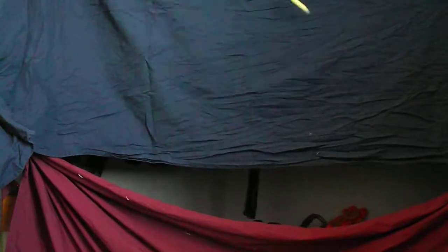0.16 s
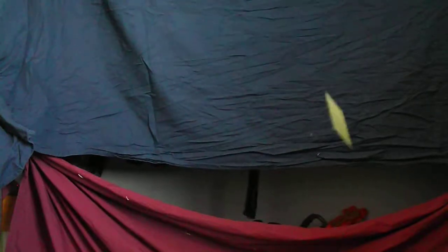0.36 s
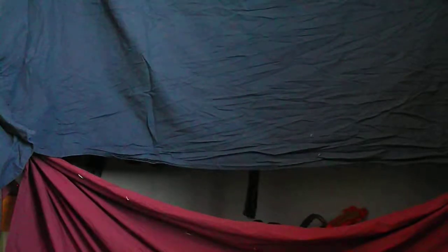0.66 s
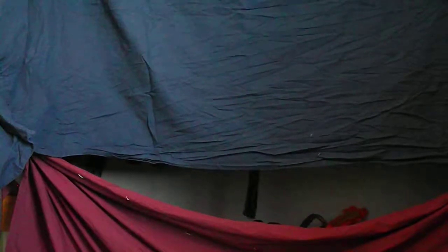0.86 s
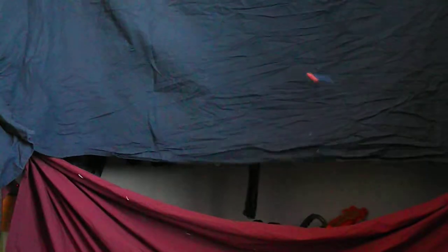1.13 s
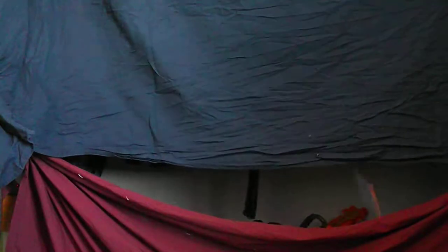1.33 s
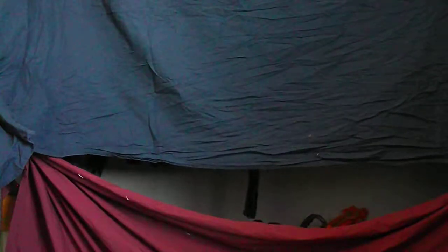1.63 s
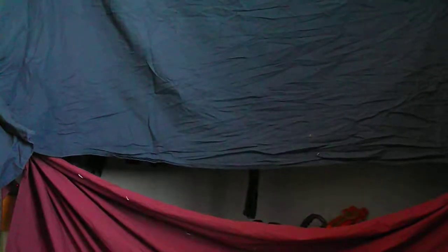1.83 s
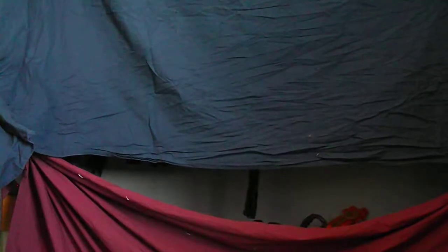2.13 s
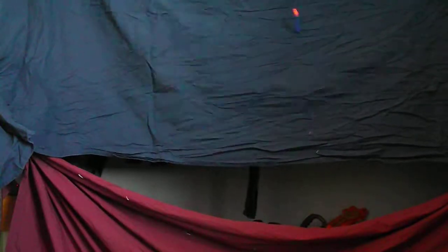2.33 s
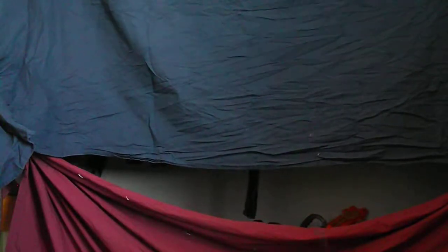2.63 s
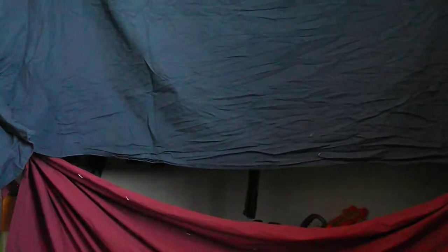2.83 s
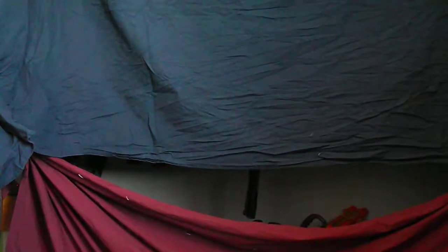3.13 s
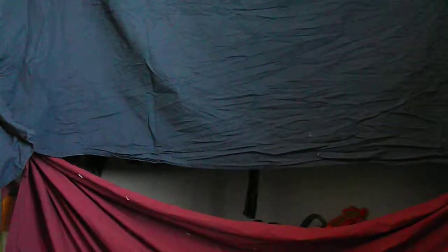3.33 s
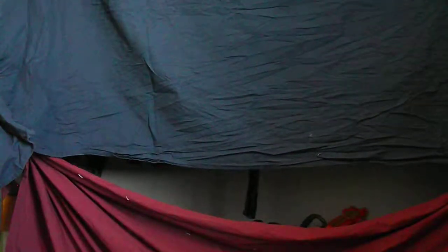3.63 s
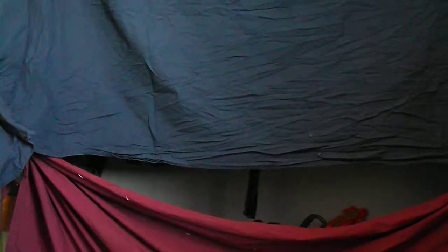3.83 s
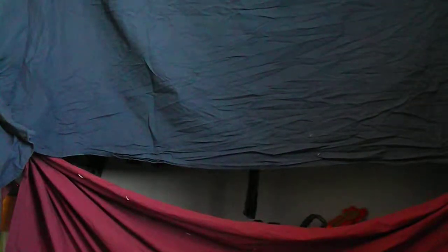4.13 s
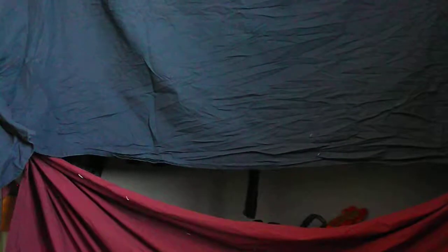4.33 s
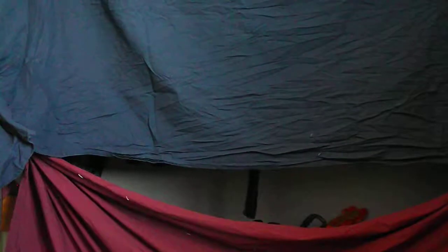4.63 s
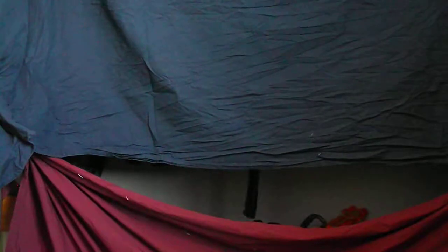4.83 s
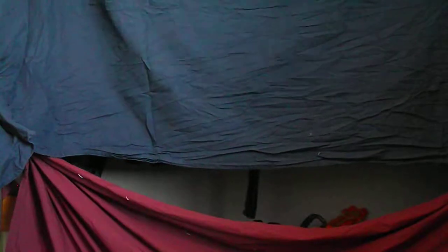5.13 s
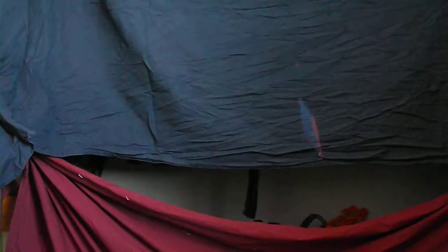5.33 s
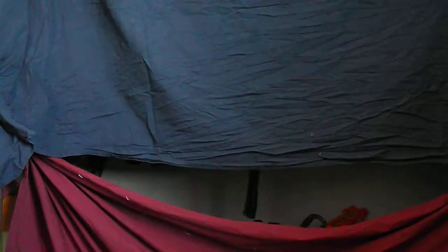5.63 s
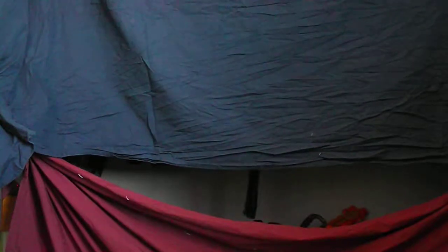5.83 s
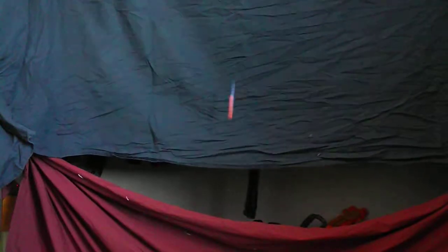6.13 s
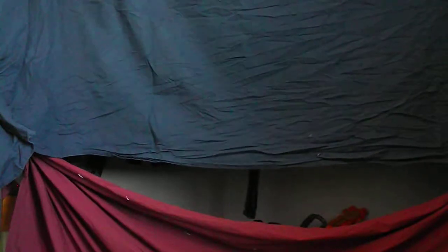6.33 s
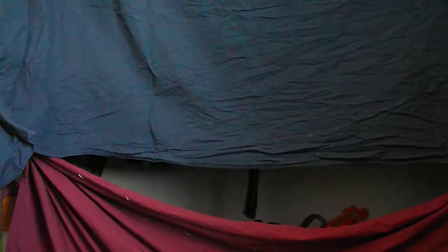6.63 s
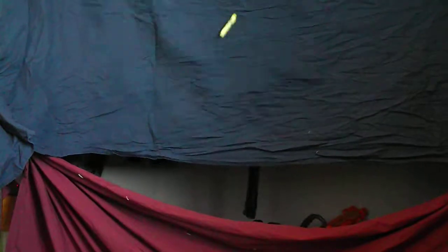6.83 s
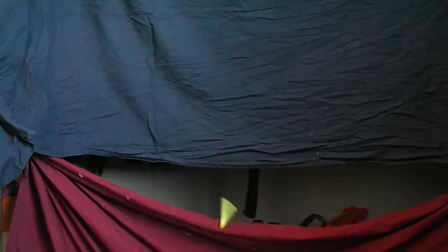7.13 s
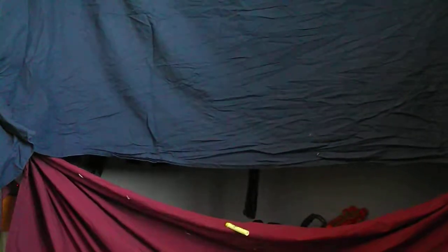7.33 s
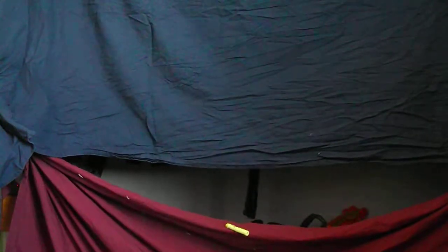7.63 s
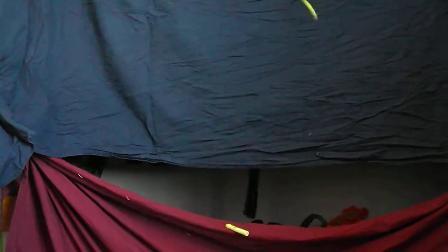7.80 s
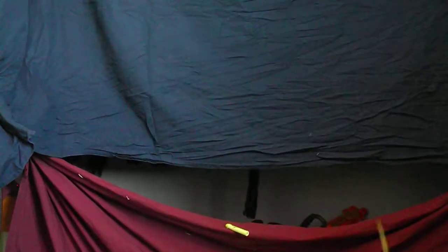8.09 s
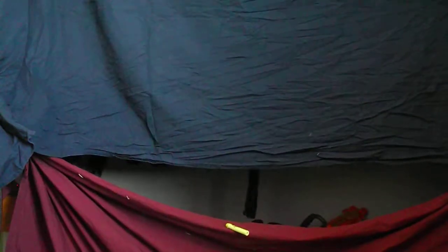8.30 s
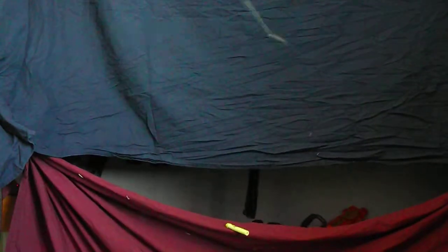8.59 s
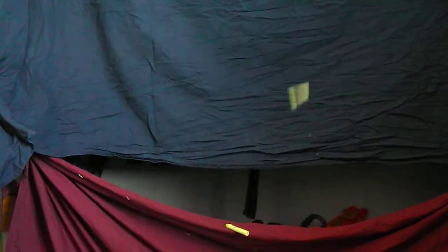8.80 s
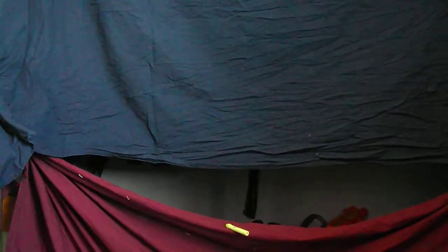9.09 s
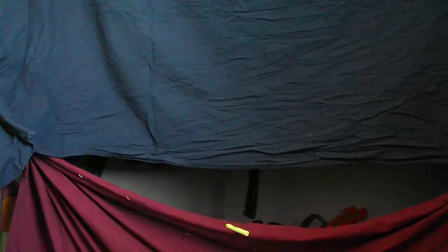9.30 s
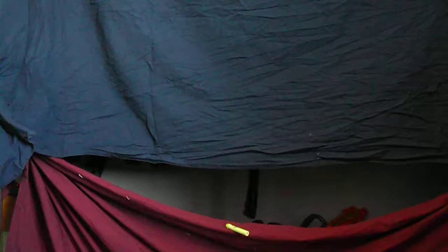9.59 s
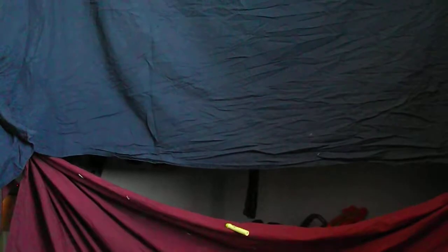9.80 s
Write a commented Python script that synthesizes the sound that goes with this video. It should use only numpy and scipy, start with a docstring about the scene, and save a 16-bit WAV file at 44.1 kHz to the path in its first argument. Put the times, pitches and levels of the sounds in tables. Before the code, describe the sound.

A dart thumps cloth, then a pump-action plastic toy is racked with sharp double clacks and scraping slide. Each trigger click releases a hard plunger slam with a short tubular ring, and a boomy cloth thud a tenth of a second later. Slow at first, then a steady run of shots, finally rattly handling. Dry small room, close, slightly overloaded microphone with hiss and a thin whine.

```python
"""A small furnished room, close to a camera: a pump-action toy dart blaster is racked eight times, fired seven.
Catches and stops clack as rough bursts through plastic shell resonances, and the slide scrapes as clumped slips.
The sprung plunger slams air into ringing tube notes; about a tenth of a second later the dart thumps a hanging
sheet, a pulse of air with a boom and a foam tick. One more dart hits right at the start. Sparse echoes make
the room; the camera adds hiss, faint whines, a frame-rate buzz, a limiter and overload."""
import sys
import numpy as np
from scipy import signal
from scipy.fft import rfft, irfft
from scipy.io import wavfile
from scipy.ndimage import uniform_filter1d

SR = 44100
rng = np.random.default_rng(int(sys.argv[2]) if len(sys.argv) > 2 else 0)


def linear_from_db(decibels):
    """Turn decibels (scalar or array-like) into linear amplitude factors; 0 gives 1."""
    return 10 ** (np.asarray(decibels, float) / 20)


def wrap_up_sound(samples):
    """Save the sound to the file named by the first command line argument, as 16-bit audio."""
    columns = np.atleast_2d(samples).T
    # keep every value between -1 and 1, then stretch to whole-number steps
    tamed = np.clip(columns, -1, 1)
    steps = np.round(tamed * 32767).astype(np.int16)
    wavfile.write(sys.argv[1], SR, steps)


N = 438794  # length in samples

# Levels in the tables balance the layers before the room and the camera.
# camera hiss, spectrum shape only: pitch_hz, relative density_db
HISS_SHAPE = [(20, -4), (65, -7), (100, -13.5), (230, -13), (700, -17.5), (1500, -26.5), (5000, -28.5),
              (7000, -23.5), (8800, -28), (11000, -18.5), (13000, -30), (16000, -38.5)]
HISS_DB = -49.5  # rms, ahead of the limiter
# steady camera whines: pitch_hz, level_db (rms, ahead of the limiter)
WHINES = [(9523, -61), (9597, -64), (9561, -71), (11240, -68)]
# buzz once a picture frame: pitch_hz, level_db (rms while on, ahead of the limiter)
BUZZ = [(3768, -60.5), (7540, -56), (11300, -66), (15070, -75)]
FRAMES_PER_S, BUZZ_CENTRE = 30.02, .32  # middle of the buzz, as a share of the frame
LIMIT_DB, LIMIT_SHARE = -10, .7  # threshold; share of the excess that is taken off
LIMIT_GRAB_S, RECOVER_DB_PER_S = .012, 26  # smoothing time constant; climb of the gain
# room decay by band: pitch_hz, t60_s
ROOM_DECAY = [(100, 0.12), (530, 0.27), (1400, 0.23), (3700, 0.26), (9700, 0.16), (16000, 0.28)]

# low wobble when the furniture or the camera stand is nudged: start_s, level_db, t60_s
NUDGES = [(3.64, -31, 0.95), (3.77, -35, 0.36), (4.18, -36.5, 0.91), (9.36, -39, 2.2)]
NUDGE_RISE_S = 0.042

# darts stopped by the sheet: start_s, push_db, tick_db
DARTS = [(.0004, -13.5, -15), (.9668, -8, -11), (2.189, -9.5, -15), (4.925, -8, -14.5), (5.817, -6.5, -9.5),
         (6.7101, -7.5, -9.5), (7.5986, -5, -7), (8.5528, -15.5, -17)]
# slack sheet booming after the push: pitch_hz, level_db, t60_s
SHEET = [(65.3, -23, 0.42), (123, -44, 0.12), (270, -49, 0.083), (326.7, -13.5, 0.098)]
# fallen darts land softly on cloth: start_s, level_db
LANDINGS = [(2.722, -30), (5.483, -30.5), (9.057, -29.5)]

# plastic shell resonances, in three groups: pitch_hz, width_hz, level_db
SHELL_LOW = [(309, 40, -9), (555, 263, -5.5), (814, 278, 0), (1210, 298, -4.5)]
SHELL_MID = [(1580, 181, -3.5), (1920, 940, -11.5), (2804, 494, -4.5), (3425, 1400, -8), (4360, 1720, -12)]
SHELL_HIGH = [(5170, 4700, -8.5), (6140, 520, 4), (8030, 470, -6.5), (10930, 1500, -8.5),
              (12000, 2700, -13), (15000, 1400, -40)]
SHELL_GROUPS = (SHELL_LOW, SHELL_MID, SHELL_HIGH)

# Every rack of the pump has three clacks, each a first blow, a rattle halfway and a last blow.
# the pump, pulled back, takes up the plunger: start_s, to_last_blow_s, first_db, last_db
TAKE_UPS = [(0.1421, 0.022, -8.5, -3.5), (1.0874, 0.022, -9.5, 0), (2.861, 0.0069, -11, -9.5),
            (4.142, .019, -6, -5.5), (5.0385, 0.015, -12, -3), (5.912, .021, -5, 0), (6.8284, .016, -5, -5),
            (7.725, 0.019, -4.5, -3)]
# the plunger latches at the back stop: start_s, to_last_blow_s, first_db, last_db
BACK_STOPS = [(.208, 0.0091, -5, -0.5), (1.1525, .011, -0.5, -4.5), (2.9221, 0.0081, -7.5, -12),
              (4.2022, 0.013, -3, -2), (5.0888, 0.0083, -2, -1.5), (5.9748, .0115, -5.5, 3),
              (6.8848, 0.0084, -4, -4), (7.7819, 0.0095, -7, 1)]
# the pump, pushed forward, closes the breech: start_s, to_last_blow_s, first_db, last_db
CLOSES = [(0.5399, 0.015, -2, -3.5), (1.4966, .012, -4, -8), (3.1482, 0.029, -18, -17),
          (4.5637, .0146, -5, -2.5), (5.4009, .015, -4, -2), (6.2968, .016, -4.5, -1),
          (7.2026, .0165, -4, -1.5), (8.1006, 0.011, -4.5, 1.5)]
# colour of each clack, rows first blow, rattle, last blow: low_db, high_db (against the middle modes)
TAKE_UP_TONE = [(3.5, 0), (-0.5, -3), (1, -4)]
BACK_STOP_TONE = [(0, -6), (0, 0), (1, -6.5)]
CLOSE_TONE = [(-1.5, -0.5), (-1, -3), (4, -13)]
# rattle against the mean of first and last blow: take_up_db, back_stop_db, close_db
RATTLE_DB = (-1.5, -8, -6.5)
# the pump starts forward: start_s
PUSH_STARTS = [.345, 1.311, 3.083, 4.355, 5.2248, 6.1303, 7.035, 7.937]

# the trigger clicks as it is squeezed: start_s, level_db
TRIGGER = [(0.7892, -26), (0.8244, -26), (2.0276, -31), (2.048, -24), (4.784, -27), (5.6337, -31.5),
           (5.665, -24), (6.486, -27), (6.5358, -24.5), (6.57, -27.5), (7.435, -19.5), (7.462, -23.5),
           (8.381, -23), (8.416, -25)]
# parts tick past each other while the pump travels: start_s, level_db
TICKS = [(.0755, -18), (.0838, -19), (.0916, -17.5), (.1931, -9), (.461, -23), (.4717, -18), (.507, -20),
         (.5142, -10), (1.0538, -17), (1.1361, -29), (1.311, -20), (1.3502, -24), (1.42, -19.5),
         (1.4364, -19), (1.4677, -20), (2.7778, -24), (2.8036, -23), (2.8113, -22), (4.0924, -22.5),
         (4.1368, -21), (4.196, -24), (4.403, -25), (4.4248, -24.5), (4.489, -19.5), (4.5047, -17.5),
         (4.535, -14.5), (4.5548, -14), (4.9971, -18.5), (5.0121, -10.5), (5.076, -9.5), (5.2248, -21.5),
         (5.277, -28.5), (5.3338, -15.5), (5.3782, -14.5), (5.881, -15.5), (5.8956, -16), (6.1303, -17.5),
         (6.164, -20.5), (6.2263, -14.5), (6.2473, -15.5), (6.2739, -15), (6.7716, -17), (6.7906, -20),
         (6.823, -9.5), (7.0892, -24.5), (7.127, -26.5), (7.1388, -16.5), (7.1597, -14), (7.1807, -13.5),
         (7.195, -13), (7.6646, -14), (7.685, -12.5), (7.7766, -9.5), (7.9569, -22), (8.04, -16.5),
         (8.0547, -25), (8.0734, -21), (8.0795, -10.5), (8.0942, -8.5)]
# a small catch snaps, thin and bright: start_s, level_db
SNAPS = [(.348, -41), (.405, -37), (2.98, -32.5), (3.138, -34), (4.094, -35), (4.1156, -23.5),
         (4.3557, -29), (4.377, -27), (4.426, -28), (5.368, -26), (6.118, -23.5), (6.2365, -23),
         (7.018, -29.5), (7.039, -25.5), (7.936, -23.5), (8.072, -21)]
# colour of small sounds: low_db, high_db (against the middle modes)
TRIGGER_TONE, TICK_TONE = (-2, -8), (0.71, -9)
SNAP_TONE = (-5, 2.4)
# knocks while the blaster is turned in the hands: start_s, level_db, low_db, high_db (against the middle modes)
HANDLING = [(2.2529, -19, -6, -6.5), (2.281, -21.5, -1, -16), (2.3649, -23.5, 11, -3.5),
            (2.6157, -19.5, 1.5, -6), (3.083, -29.5, -13, -2), (3.1563, -19.5, 3, -19),
            (3.2865, -31, -3.5, -12), (3.6696, -25.5, -11, -5.5), (3.69, -39.5, -1, -8),
            (3.8976, -26, 13, -5), (3.9323, -23, 3, -2), (8.6216, -30, 3, -23), (8.6703, -13.5, -2, -11.5),
            (8.855, -37.5, 10, -5), (9.045, -41, -5, -12), (9.0842, -21, -3, -4), (9.1312, -19, 4, 0),
            (9.174, -13.5, -8, -7), (9.1795, -4, -4.5, -9), (9.19, -3.5, -2.5, -9), (9.2005, -8, 0, -6),
            (9.222, -27, 5, -13), (9.256, -34, -2, -7), (9.281, -16, 5, -10), (9.2876, -26, 13, -11),
            (9.33, -44, -1, -8), (9.3483, -11, 5, -22), (9.3605, -6.5, 1, -9), (9.383, -32, 25, -22),
            (9.5289, -20.5, -3, -10.5), (9.5439, -20, 14, -16), (9.566, -22, 10, -15), (9.59, -30, 10, -10),
            (9.7, -29, 12, -10), (9.8015, -24, 9, -9), (9.5573, -21, -3, -8), (9.6171, -16.5, 0, -8),
            (9.6501, -15, -0.5, -10), (9.6632, -22, 12, 2), (9.736, -23, 3, -6), (9.8347, -19.5, 10.5, -15)]
# shape of first blows and rattles, and of all the small sounds: decay_s, rise_s
HARD_BLOW_S, LIGHT_BLOW_S = (.004, .0008), (.005, 0.0014)
# shape of the last blow of a clack: decay_s, rise_s
LAST_BLOW_S = (0.002503, 0.000605)

# Pulled, the slide scrapes from a little before take-up to the back stop and lets go;
# pushed, it scrapes, then rushes home.
PULL_LEAD_S, LET_GO_S, RUSH_S = .045, .07, .06
# sliding force against the louder of the first and last blow of the take-up
PULL_START_DB, TAKE_UP_DB, BACK_DB, LET_GO_DB = -39.5, -26, -21, -34
# sliding force against the louder of the first and last blow of the close
PUSH_DB, RUSH_DB, CLOSE_DB = -35, -33.5, -21

# shots: release_s, latch_db, slam_db, rebound_db, release_to_rebound_s
SHOTS = [(.8684, -7, 6.5, -3.5, 0.018), (2.0806, -6.5, 3.5, -4, 0.02), (4.827, -1.5, 3.5, -3, 0.018),
         (5.7178, -4.5, 3, -1, 0.018), (6.608, 0, 4, 2, 0.016), (7.501, -4, 4, 1.5, 0.019),
         (8.4554, 0.5, -2.5, -7.5, 0.012)]
# air tube and barrel ringing after the slam, until choked: pitch_hz, level_db, t60_s
TUBE = [(70, -19.5, 0.11), (141, -4.5, 0.05), (248, -8.5, 0.086), (324.4, -2, 0.18), (480.4, -4.5, 0.17),
        (709, 7.5, 0.017), (909, -3.5, 0.1), (1182, -1.5, 0.055), (1432, -9, 0.12)]
# air column left humming: pitch_hz, width_hz, level_db
BARREL = [(420, 105, -13), (560, 90, -7), (750, 250, -16.5)]


def evened(x):
    """Scales to rms 1."""
    return x / np.sqrt(np.mean(x ** 2) + 1e-20)


def read(points, hz):
    """Reads a table on a log-frequency axis."""
    f, value = np.transpose(points)
    return np.interp(np.log(hz + 1), np.log(f + 1), value)


def add(mix, s, sound):
    """Mixes a sound in at s seconds."""
    part = mix[round(s * SR):][:len(sound)]
    part += sound[:len(part)]


def level(curves):
    """Sums the gains of several dB curves over time, each near silent outside its span."""
    t = np.arange(N) / SR
    return sum(linear_from_db(np.interp(t, *np.transpose(rows), -120, -120)) for rows in curves)


def through(x, modes, grip):
    """Two-pole resonances of alternating sign, shifted a little by the grip; white noise keeps its level."""
    taps, t = 0, np.arange(2048) / SR
    for k, (hz, width, db) in enumerate(modes):
        shift, tilt = grip * rng.standard_normal(2)
        decay = width * np.exp(-np.pi * width * t)
        tone = np.sin(2 * np.pi * hz * (1 + shift) * t)
        taps = taps + (-1) ** k * linear_from_db(db + 9.0 * tilt) * decay * tone
    return signal.oaconvolve(x, taps / np.linalg.norm(taps))


def ring(modes, rise_s, detune):
    """Dying sines that start together, a little out of tune from blow to blow."""
    t = np.arange(SR // 3) / SR
    off = 1 + detune * rng.standard_normal(len(modes))
    tones = 0
    for (hz, db, t60), o in zip(modes, off):
        tones = tones + linear_from_db(db - 60 * t / t60) * np.sin(2 * np.pi * hz * o * t)
    return tones * (1 - np.exp(-t / rise_s))


def chatter(decay_s, rise_s=0.0011):
    """One blow: a contact click shared by three mode groups, in a burst of loose parts unlike in each group."""
    t = np.arange(1500)[:, None] / SR
    lumps = evened(uniform_filter1d(rng.standard_normal(t.shape), size=30, axis=0))
    loose = evened(linear_from_db(2.8 * lumps) * rng.standard_normal((len(t), 3)))
    loose = loose * np.exp(-t / decay_s) * (1 - np.exp(-t / rise_s))
    click = np.arange(len(t))[:, None] == round(2 * rise_s * SR)
    return loose + linear_from_db(6.5) * click


def camera():
    """Shaped noise hiss, steady sine whines and a short buzz with every picture frame."""
    t = np.arange(N) / SR
    spectrum = rfft(rng.standard_normal(N))
    hiss = irfft(spectrum * linear_from_db(read(HISS_SHAPE, np.fft.rfftfreq(N, 1 / SR))), N)

    def tones(lines):
        """Steady sines at random phase."""
        return sum(np.sqrt(2) * linear_from_db(db) * np.sin(2 * np.pi * (hz * t + rng.random())) for hz, db in lines)

    frame_offset = (FRAMES_PER_S * t - BUZZ_CENTRE + .5) % 1 - .5
    buzz_on = uniform_filter1d((abs(frame_offset) < .15) * 1., size=60)  # softened edges
    return linear_from_db(HISS_DB) * evened(hiss) + tones(WHINES) + buzz_on * tones(BUZZ)


def room(x, count=5):
    """Sparse random-sign echoes, each band dying at its own speed; the sound fades from one pattern to the next."""
    turn = np.arange(N) / SR / .05 % count  # a new pattern every 50 ms, round and round
    out = 0
    for k in range(count):
        taps = np.zeros(SR // 2)
        at = np.arange(120, len(taps) - 12, 12)
        taps[at + rng.integers(0, 12, len(at))] = rng.choice([-1., 1.], len(at))
        hz, t, z = signal.stft(taps, SR, nperseg=256)
        decay = linear_from_db(-60 * t / read(ROOM_DECAY, hz)[:, None])
        tail = signal.istft(z * decay, SR, nperseg=256)[1]
        near = np.clip((turn - k + count / 2) % count - count / 2, -1, 1)
        send = x * np.cos(np.pi / 2 * near)
        out = out + signal.oaconvolve(send, tail / np.linalg.norm(tail))[:N]
    return out


def wobble():
    """Slow lumpy swings: noise from 15 to 65 Hz, dying after each nudge."""
    t, swing = np.arange(SR) / SR, np.zeros(N)
    for s, db, t60 in NUDGES:
        add(swing, s, np.minimum(t / NUDGE_RISE_S, 1) * linear_from_db(db - 60 * t / t60))
    band = signal.butter(4, [15, 65], "bandpass", fs=SR, output="sos")
    return swing * evened(signal.sosfilt(band, rng.standard_normal(N)))


def darts():
    """The sheet shoves air once, swings back and booms; the foam tip ticks; fallen darts pat on cloth."""
    out = np.zeros(N)
    u = np.arange(900) / SR / 0.00033  # time in units of the push
    shove = 6.14 * u ** 2 * (1 - 0.27 * u) * np.exp(-u)
    tip_modes = [(1200, 3600, 0), (4000, 3300, -4)]  # pitch_hz, width_hz, level_db
    cloth_modes = [(288, 174, 8.5), (514, 740, -0.5)]  # pitch_hz, width_hz, level_db
    for s, push_db, tick_db in DARTS:
        add(out, s, linear_from_db(push_db) * shove)
        add(out, s, linear_from_db(push_db) * ring(SHEET, 0.0012, 0.075))
        add(out, s, linear_from_db(tick_db) * through(chatter(0.0021)[:, 0], tip_modes, 0))
    for s, db in LANDINGS:
        add(out, s, linear_from_db(db) * through(chatter(0.011)[:, 0], cloth_modes, 0.035))
    return out


def strokes():
    """How hard the pump slides on its rails in each pull and push, as (time_s, force_db) curves."""
    out = []
    for take, back, close, push in zip(TAKE_UPS, BACK_STOPS, CLOSES, PUSH_STARTS):
        pull_db, push_db = max(take[2:]), max(close[2:])
        stop, end = back[0] + back[1], close[0] + close[1]  # last blows of back stop and close
        out.append([(take[0] - PULL_LEAD_S, pull_db + PULL_START_DB), (take[0], pull_db + TAKE_UP_DB),
                    (stop, pull_db + BACK_DB), (stop + LET_GO_S, pull_db + LET_GO_DB)])
        out.append([(push, push_db + PUSH_DB), (max(end - RUSH_S, push), push_db + RUSH_DB),
                    (end, push_db + CLOSE_DB)])
    return out


def slide(count=4):
    """Sliding plastic catches and slips in clumps of small ticks, in several layers of differing colour."""
    out, force = 0, level(strokes())
    for _ in range(count):
        clumps = linear_from_db(4.2 * evened(uniform_filter1d(rng.standard_normal(N), size=400)))
        hits = rng.random(N) < 260 / SR  # about 260 slips a second
        sizes = linear_from_db(4.2 * np.minimum(rng.exponential(1, N), 4))
        slips = hits * sizes * rng.choice([-1, 1], N)
        for modes, db in zip(SHELL_GROUPS, (-5, -5, -14)):
            out = out + linear_from_db(db) * through(force * evened(clumps * slips), modes, 0.18)[:N]
    return out / np.sqrt(count)


def clacks():
    """Pump, trigger and handling blows as rows: start_s, level_db, low_db, high_db, decay_s, rise_s."""
    light = HANDLING + [(*row, *TRIGGER_TONE) for row in TRIGGER]
    light += [(*row, *TICK_TONE) for row in TICKS]
    light += [(*row, *SNAP_TONE) for row in SNAPS]
    rows = [(*row, *LIGHT_BLOW_S) for row in light]
    shapes = (HARD_BLOW_S, HARD_BLOW_S, LAST_BLOW_S)
    kinds = zip((TAKE_UPS, BACK_STOPS, CLOSES), (TAKE_UP_TONE, BACK_STOP_TONE, CLOSE_TONE), RATTLE_DB)
    for table, tones, rattle_db in kinds:
        for s, span, first_db, last_db in table:
            rattle = (s + span / 2, (first_db + last_db) / 2 + rattle_db)
            blows = (s, first_db), rattle, (s + span, last_db)
            rows += [(*blow, *tone, *shape) for blow, tone, shape in zip(blows, tones, shapes)]
    return rows


def shell():
    """Knocks and scrapes shake three groups of shell modes; returns the direct sound and the feed to the walls."""
    direct, clicks = np.zeros(N), np.zeros((N, 3))
    knocks = clacks()
    for s, latch_db, slam_db, rebound_db, after in SHOTS:
        knocks.append((s, latch_db, -3, 0, .004, .002))
        knocks.append((s + 0.0067, slam_db - 8, -3, -8, .005, .001))
        knocks.append((s + after, rebound_db, -5, -1, .004, .001))
    for s, db, low_db, high_db, decay_s, rise_s in knocks:
        share = linear_from_db([low_db, 0, high_db])
        blow = linear_from_db(db) * chatter(decay_s, rise_s) * share / np.linalg.norm(share)
        # colour changes with the grip
        add(direct, s, sum(through(b, modes, 0.05) for b, modes in zip(blow.T, SHELL_GROUPS)))
        # the walls get one click of equal energy in each group
        add(clicks, s + decay_s / 2, np.linalg.norm(blow, axis=0)[None])
    scrape = slide()
    # no grip shift here: the walls hear the even colour of all sides at once
    sides = sum(through(c, modes, 0)[:N] for c, modes in zip(clicks.T, SHELL_GROUPS))
    return direct + scrape, scrape + sides


def plunger():
    """The plunger slams home and rings the air tube, its seal seats and chokes the ring, and the barrel hums on."""
    out, t = np.zeros(N), np.arange(SR // 3) / SR
    choke = 1 / (1 + np.exp(np.minimum((t - .013) / 0.0023, 50)))  # halfway shut at 13 ms
    hum = (1 - np.exp(-t / 0.013)) * linear_from_db(-60 * (t / 0.19) ** 1.53)
    for s, _, slam_db, *_ in SHOTS:
        add(out, s + 0.003855, linear_from_db(slam_db + 1.5) * choke * ring(TUBE, 0.0064, 0.045))
        breath = through(hum * rng.standard_normal(len(t)), BARREL, 0.0092)
        add(out, s + 0.0095, linear_from_db(slam_db - 14) * breath)
    return out


def scene():
    """Blaster and sheet, direct and from the walls, with the low wobble."""
    body, sides = shell()
    slam, sheet = plunger(), darts()
    walls = room(linear_from_db(-3.0) * sides + linear_from_db(-7) * body + linear_from_db(-13) * slam + linear_from_db(-1.0) * sheet)
    return (body + slam + sheet + walls + wobble())[None]


def limiter(x):
    """Loud peaks pull the gain down, smoothed over some milliseconds; it climbs back at a steady rate."""
    peak_db = 10 * np.log10(abs(uniform_filter1d(x[0] ** 2, size=88)) + 1e-12)  # power over 2 ms
    climb = np.arange(N) * RECOVER_DB_PER_S / SR
    over_db = LIMIT_SHARE * np.maximum(peak_db - LIMIT_DB, 0)
    held_db = np.maximum.accumulate(over_db + climb) - climb
    keep = np.exp(-1 / (LIMIT_GRAB_S * SR))
    return x / linear_from_db(signal.lfilter([1 - keep], [1, -keep], held_db))


def top_cut(x):
    """Nothing passes above the cut-off."""
    return signal.sosfilt(signal.butter(12, 16470, fs=SR, output="sos"), x)


def record(dry):
    """The microphone drops the deepest bass, camera noise joins, a limiter ducks both, the band ends, peaks clip."""
    low_cut = signal.butter(1, 40, "highpass", fs=SR, output="sos")
    heard = signal.sosfilt(low_cut, dry) + camera()
    band_edge = signal.firwin(255, 15900, window=("kaiser", 4), fs=SR)  # low-pass
    limited = signal.oaconvolve(limiter(heard), band_edge[None], "same")
    overloaded = np.clip(limited, -1, 1)
    return top_cut(overloaded)


dry = scene()
out = record(dry)
wrap_up_sound(out)
```